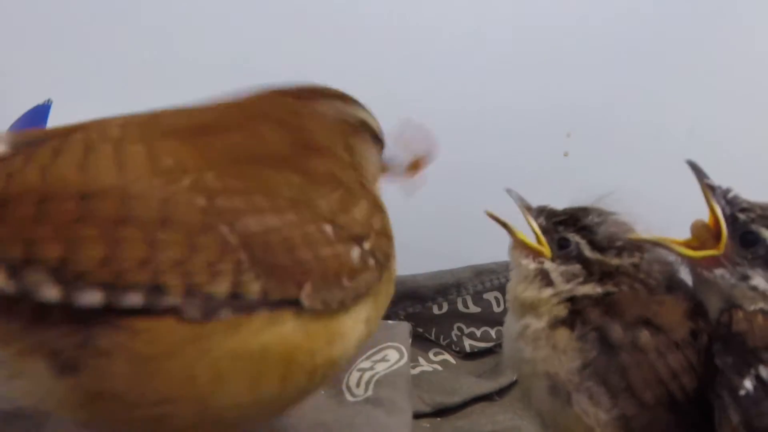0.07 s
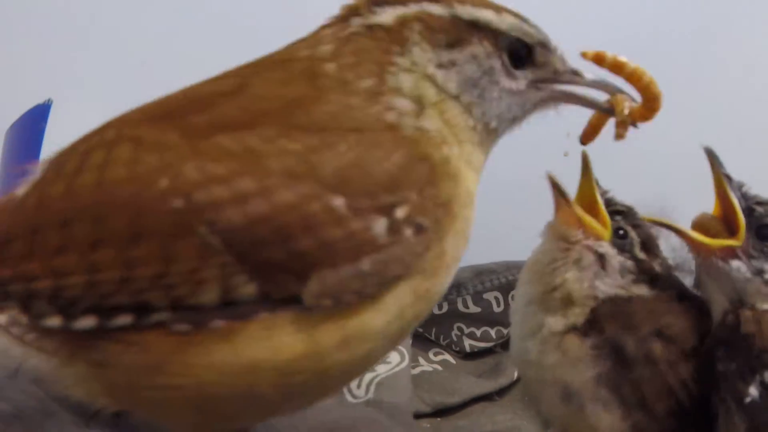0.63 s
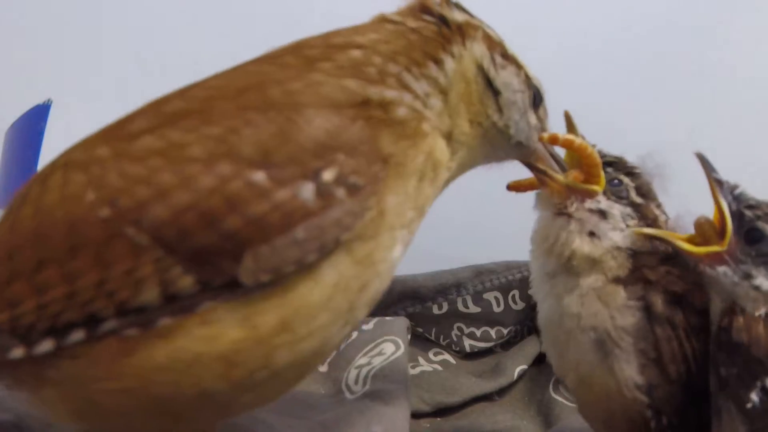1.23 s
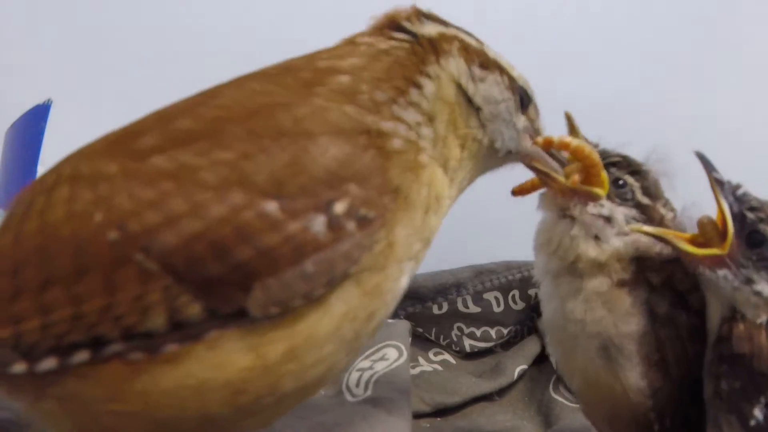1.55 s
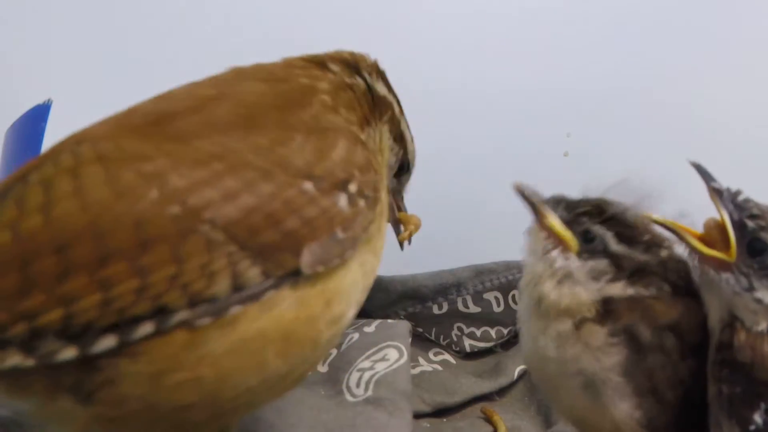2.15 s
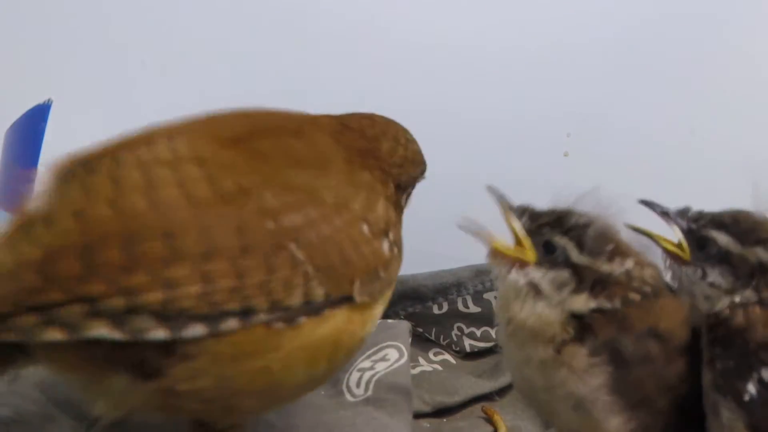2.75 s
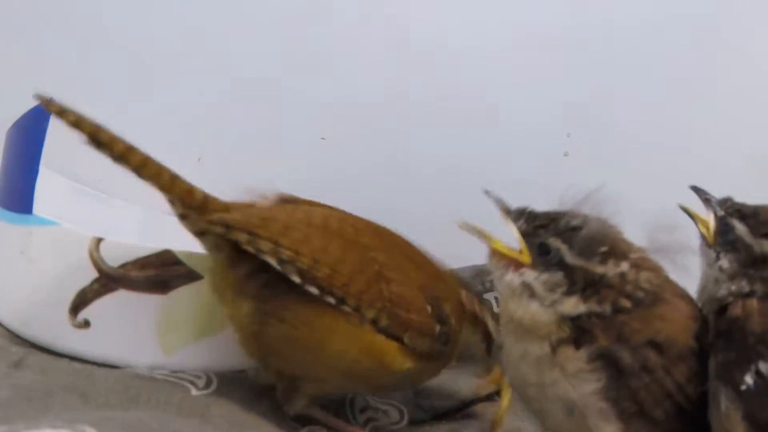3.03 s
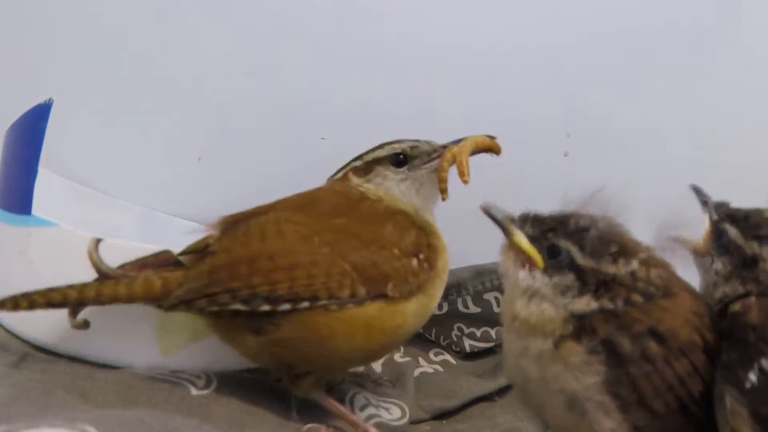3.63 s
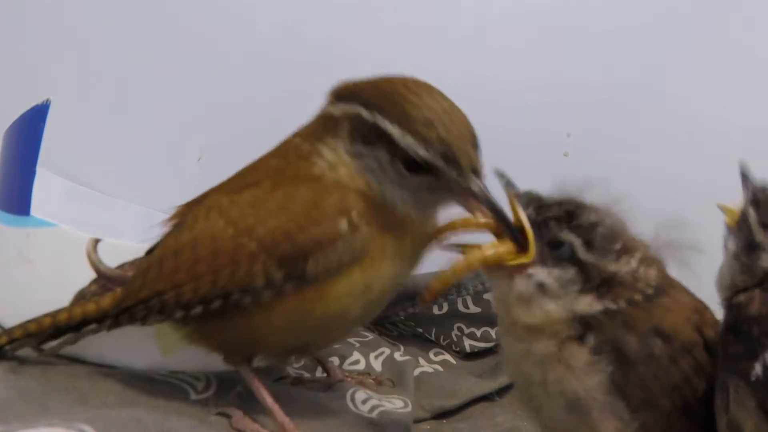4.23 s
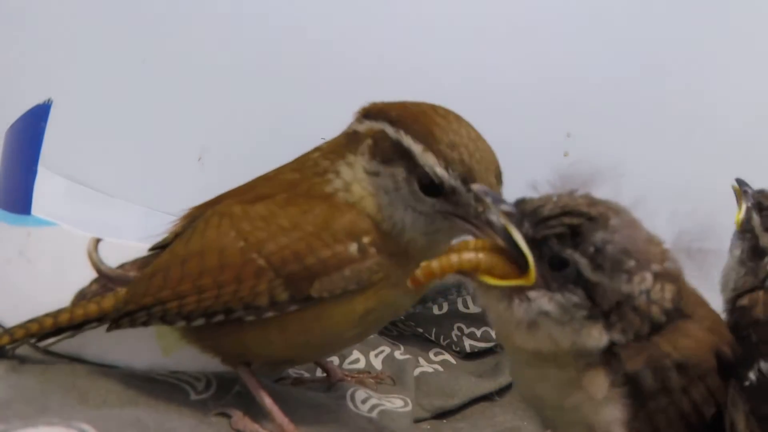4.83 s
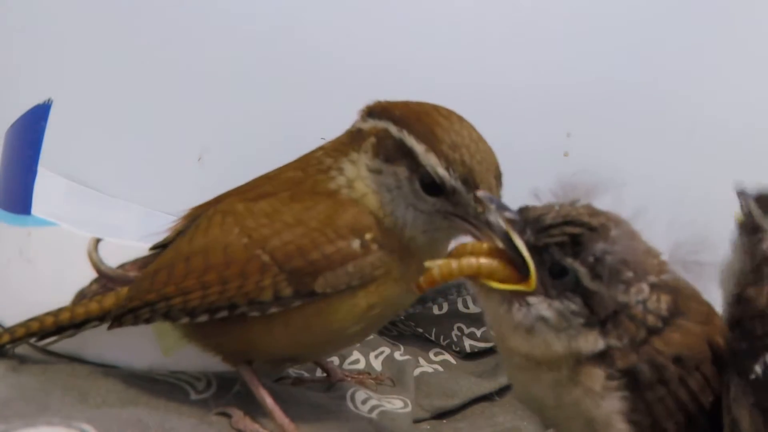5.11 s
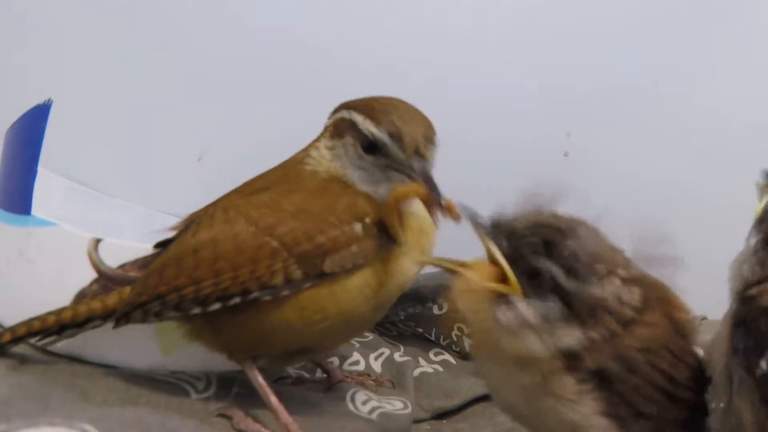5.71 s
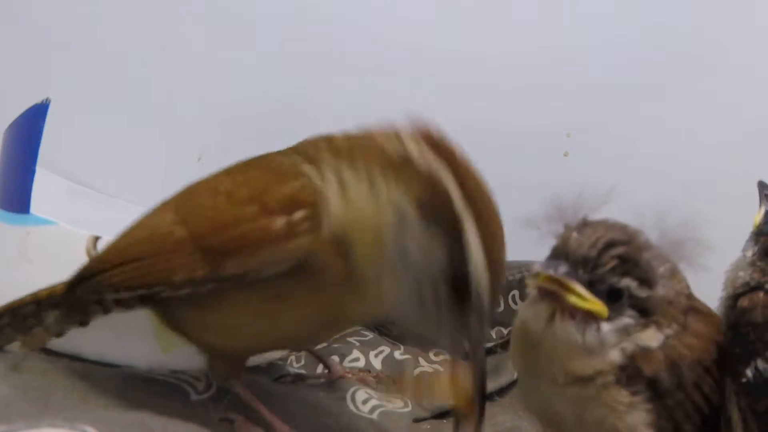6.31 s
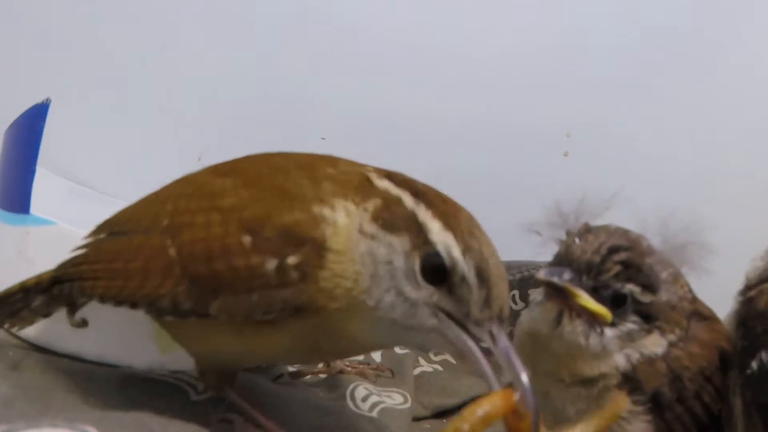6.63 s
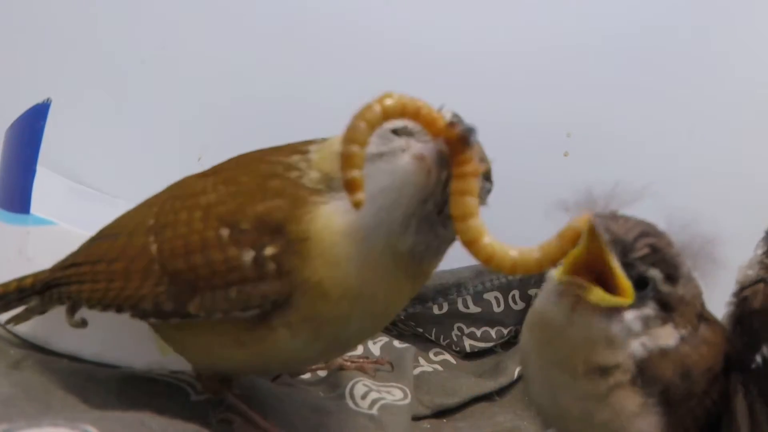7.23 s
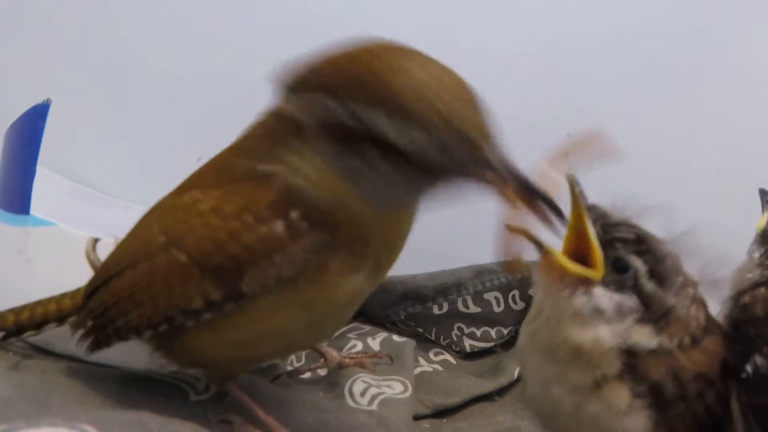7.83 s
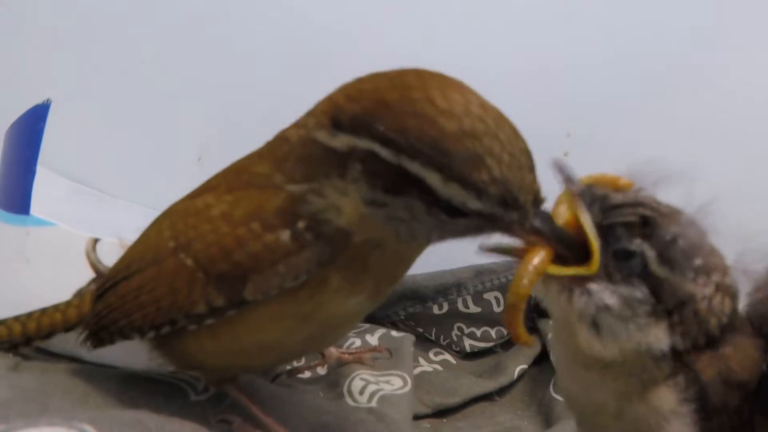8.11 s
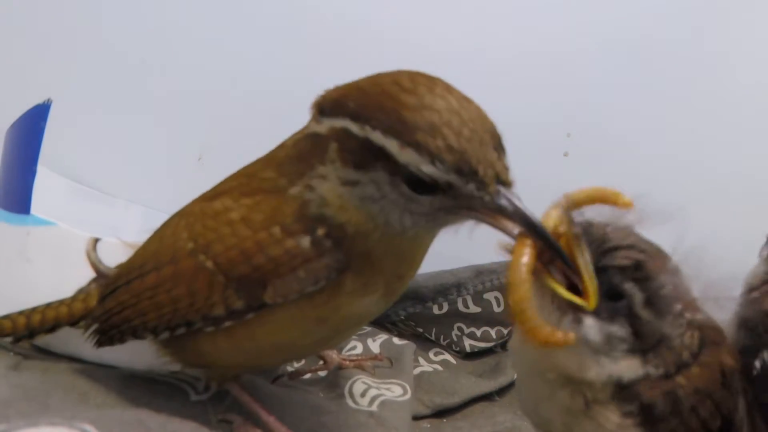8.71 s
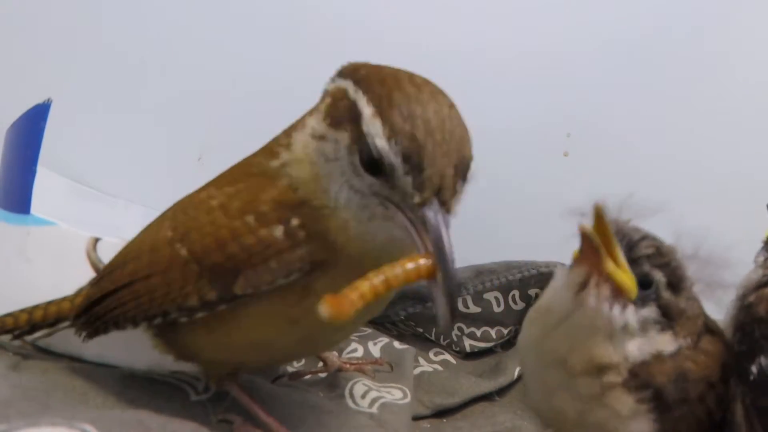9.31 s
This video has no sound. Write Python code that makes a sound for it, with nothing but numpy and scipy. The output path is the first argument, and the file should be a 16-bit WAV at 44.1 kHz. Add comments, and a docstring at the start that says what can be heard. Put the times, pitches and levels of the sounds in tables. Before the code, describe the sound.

Baby birds beg in brief, hoarse, shrill squeaks, with occasional dull hops, tiny bill clicks and a faint distant songbird.

```python
"""Wren nestlings begging in a shed

Nestlings beg eight times, close by, while a parent feeds them. Each call opens as a dry rasp of
turbulent air; then both sides of the syrinx break into a hoarse two-voiced whistle that drops away.
The parent's hops ring the nest box, its bill clicks and its feathers brush the nest.
A far songbird sings briefly over a low rumble and microphone hiss."""
import sys
import numpy as np
from scipy import signal
from scipy.fft import rfft, irfft, next_fast_len
from scipy.io import wavfile

SR = 44100
rng = np.random.default_rng(int(sys.argv[2]) if len(sys.argv) > 2 else 0)


def dump_mix(stems):
    """Bounce the given channels to the path in sys.argv[1] as a 16-bit WAV at rate SR."""
    frames = np.atleast_2d(stems).T  # one column per channel
    limited = np.clip(frames, -1, 1)  # hard clip at full scale
    pcm = np.round(limited * 32767).astype(np.int16)
    wavfile.write(sys.argv[1], SR, pcm)


N = 421155


def gain_of(db):
    """Amplitude grows tenfold for every 20 dB."""
    return 10 ** (np.asarray(db) / 20)

def unit_rms(x):
    """Normalisation to a mean power of one."""
    return x / np.sqrt(np.mean(x ** 2) + 1e-20)

def curve_at(points, hz):
    """Interpolation on a logarithmic frequency axis."""
    point_hz, value = np.transpose(points)
    return np.interp(np.log(hz + 1), np.log(point_hz + 1), value)

def add(mix, start, sound):
    """Superposition: a sound adds to the mix from its start in seconds."""
    part = mix[max(round(start * SR), 0):][:len(sound)]
    part += sound[:len(part)]

def sine(hz):
    """An oscillator's phase is the running integral of its frequency."""
    return np.sin(2 * np.pi * np.cumsum(hz) / SR)

def bandpass(x, low_hz, high_hz, order=2):
    """A band-pass filter attenuates what lies outside its two edges."""
    return signal.sosfilt(signal.butter(order, [low_hz, high_hz], "band", fs=SR, output="sos"), x)

def noise(*spectra, strength=1):
    """Source and filter: modulated white noise is coloured by each spectrum, then set to unit rms."""
    length = next_fast_len(N)
    hz = np.fft.rfftfreq(length, 1 / SR)
    colour = gain_of(sum(curve_at(points, hz) for points in spectra))
    source = rng.standard_normal(N) * strength
    return unit_rms(irfft(rfft(source, length) * colour, length)[:N])

def wander(rate_hz):
    """Low-passed noise gives a random drift of unit rms."""
    return unit_rms(signal.sosfilt(signal.butter(2, rate_hz, fs=SR, output="sos"), rng.standard_normal(N)))

def span(start, end, fade_s):
    """A tapered time window: its sample numbers, its times and its raised-cosine gate."""
    at = np.arange(max(int(start * SR), 0), min(int(max(end, start + fade_s) * SR), N))
    t = at / SR
    ramp = np.clip(np.minimum(t - start, end - t) / fade_s, 0, 1)
    return at, t, np.sin(np.pi / 2 * ramp) ** 2

def echoes(x, decay, gap_s):
    """Reverberation: sparse reflections die exponentially; decay pairs Hz with seconds to fall 60 dB."""
    length = SR // 2
    taps = rng.choice([-1., 1.], length) * (rng.random(length) < .1) * (np.arange(length) > gap_s * SR)
    hz, t, bands = signal.stft(taps, SR, nperseg=256)
    damping = gain_of(-60 * t / curve_at(decay, hz)[:, None])
    tail = signal.istft(bands * damping, SR, nperseg=256)[1]
    return signal.oaconvolve(x, tail / np.linalg.norm(tail))[:N]


# The outdoor rumble. Each row: frequency in Hz, relative spectral level in dB.
RUMBLE_SPECTRUM = [(13, -22), (22, -1), (35, -1), (53, -15.5), (68, -8), (81, -4.5), (108, -11.5),
                   (134, -8), (146, -11), (167, -19), (184, -20.5), (205, -29), (226, -31), (400, -36.5),
                   (520, -63.5), (880, -120)]
# Hums that swell out of it. Each row: start and end in seconds, pitch in Hz, level in dB.
HUM_SWELLS = [(0, 0.807, 80, -58.5), (1.982, 2.847, 88, -48), (6.3, 6.893, 86, -51.5),
              (7.198, 7.847, 80, -50)]
# Hiss, strongest at the microphone's port resonance. Each row: frequency in Hz, relative level in dB.
HISS_SPECTRUM = [(250, -6), (450, 0.5), (1000, -2.5), (2000, -6.5), (3500, -12), (4300, -17), (5700, -14),
                 (6150, -9.5), (6500, 1), (7200, -7), (9000, -10.5), (10300, -17.5), (12300, -14),
                 (13300, -29)]

def background(rumble_db, drift_db, hiss_db):
    """The noise floor is a superposition of drifting rumble, passing hums and steady microphone hiss."""
    rumble = noise(RUMBLE_SPECTRUM) * gain_of(rumble_db + drift_db * wander(rate_hz=1.2))
    for start, end, hz, level_db in HUM_SWELLS:
        at, t, gate = span(start, end, fade_s=.19)
        rumble[at] += gain_of(level_db) * gate * np.sin(2 * np.pi * hz * t)
    return rumble + gain_of(hiss_db) * noise(HISS_SPECTRUM)


# The far song. Each row: start and length in seconds, first and last pitch in Hz, relative level in dB,
# burr as a fraction of the pitch.
SONG_NOTES = [(0.332, 0.085, 2510, 2750, -71, .04), (0.482, 0.085, 2450, 2500, -72, .03),
              (6.016, 0.046, 2570, 2710, -63, .025), (6.042, 0.07, 3054, 3414, -61, .045),
              (6.168, 0.1, 2450, 2570, -65, .03), (6.455, 0.11, 3940, 3820, -70, .007),
              (6.447, 0.081, 2680, 2586, -67.5, .025), (6.591, 0.091, 2300, 2580, -69, .04),
              (6.84, .18, 3980, 3800, -72.5, .008), (6.87, 0.089, 2633, 2540, -66, .025),
              (6.915, 0.08, 2960, 3130, -66, .045), (7.019, 0.095, 2054, 2630, -65, .035)]

def far_bird(direct_db):
    """Random frequency modulation gives slurred whistles a burr; scattering by trees blurs them."""
    song, tremble = np.zeros(N), wander(rate_hz=260)
    for start, length, start_hz, end_hz, level_db, burr in SONG_NOTES:
        at, t, gate = span(start, start + length, fade_s=.039)
        glide_hz = np.interp(t, [start, start + length], [start_hz, end_hz])
        song[at] += gain_of(level_db) * gate * sine(glide_hz * (1 + burr * tremble[at]))
    return gain_of(direct_db) * song + 1.1 * echoes(song, [(2000, .3), (4000, .29)], gap_s=.0092)


# The parent's hops and shoves. Each row: start in seconds, peak in dB, pitch in Hz, seconds to fall 60 dB.
HOPS = [(1.991, -32.5, 133, 0.1), (2.919, -32, 140, 0.17), (3.048, -27, 130, 0.062),
        (3.905, -28.5, 92.8, .1), (5.926, -36.5, 142, 0.095), (6.035, -36, 135, 0.066),
        (9.344, -35, 136, 0.13)]

def box_thumps(rise_s):
    """Damped oscillation: each hop pushes the nest box, which rings low and briefly."""
    out, t = np.zeros(N), np.arange(SR // 3) / SR
    onset = 1 - np.exp(-(t / rise_s) ** 2)
    for start, peak_db, hz, t60 in HOPS:
        ring = np.sin(2 * np.pi * hz * t) * onset * gain_of(-60 * t / t60)
        add(out, start, gain_of(peak_db) * ring / abs(ring).max())
    return out


# Feathers against the nest. Each row: frequency in Hz, relative spectral level in dB.
FEATHER_SPECTRUM = [(2500, -25), (4000, -4), (4800, 0), (6000, -5), (8000, -25)]

def feather_rustle(start, end, level_db, grain_db, fade_db):
    """Friction makes grainy, fading noise as the parent brushes the nest while lifting a worm."""
    out = np.zeros(N)
    brush = noise(FEATHER_SPECTRUM, strength=gain_of(grain_db * wander(rate_hz=200)))
    at, _, gate = span(start, end, fade_s=.015)
    out[at] = brush[at] * gate * gain_of(level_db - fade_db * np.linspace(0, 1, len(at)))
    return out


# Bill clicks and claw ticks. Each row: start in seconds, peak in dB, resonance in Hz, body gain in dB.
CLICKS = [(1.96, -56, 4600, -3), (2.087, -43, 4840, -2), (2.88, -57, 4600, -3), (3.043, -49, 5200, -3),
          (3.87, -55, 4580, -3), (4.511, -54, 4770, -3), (6.591, -41, 4970, -5), (6.630, -46.5, 5300, -5),
          (6.827, -50.5, 4500, -1), (8.054, -43.5, 4930, -4), (8.637, -55, 5000, -3)]

def clicks(t60):
    """Impact excitation: a short burst drives a broad resonance and a lower band that gives it body."""
    out, t = np.zeros(N), np.arange(2048) / SR
    for start, peak_db, hz, body_db in CLICKS:
        burst = rng.standard_normal(len(t)) * gain_of(-60 * t / t60)
        click = bandpass(burst, hz * .72, hz * 1.22) + gain_of(body_db) * bandpass(burst, 1100, 3800)
        add(out, start, gain_of(peak_db) * click / abs(click).max())
    return out


# The chips that open most calls. Each row: start and length in seconds, level in dB, pitch in Hz.
ONSET_CHIPS = [(0.711, 0.014, -40, 5430), (1.682, 0.0061, -31.5, 6215), (3.454, 0.0092, -38.5, 5400),
               (4.232, .008, -42, 4860), (6.22, 0.0098, -29.5, 6280), (7.294, 0.007, -34, 5085),
               (9.092, 0.0049, -34, 5450)]

def chips(rise, jitter):
    """An onset transient: the syrinx opens with a brief, rough upward glide."""
    out, tremble = np.zeros(N), 1 + jitter * wander(rate_hz=1300)
    for start, length, level_db, hz in ONSET_CHIPS:
        at, t, gate = span(start, start + length, fade_s=.002)
        glide_hz = hz * (1 + rise * ((t - start) / length - .5))
        out[at] += gain_of(level_db) * gate * sine(glide_hz * tremble[at])
    return out


# Thin squeaks within the rasp. Each row: start and end in seconds, first and last pitch in Hz,
# relative level in dB.
MEMBRANE_SLIPS = [(0.803, 0.87, 8150, 7950, -38), (4.339, 4.4, 7900, 7560, -41.5),
                  (7.388, 7.432, 8800, 7640, -40), (9.188, 9.211, 8800, 7700, -38)]

def squeaks(warble_hz, depth, jitter):
    """Sawtooth frequency modulation: the membrane slips in quick downward slurs before it settles."""
    out, tremble = np.zeros(N), 1 + jitter * wander(rate_hz=1100)
    for start, end, start_hz, end_hz, level_db in MEMBRANE_SLIPS:
        at, t, gate = span(start, end, fade_s=.004)
        slur = (t - start) * warble_hz % 1  # runs from 0 to 1 in each slip
        pitch_hz = np.interp(t, [start, end], [start_hz, end_hz]) * (1 + depth * (.5 - slur))
        pulses = 2 * np.sin(np.pi * slur)
        out[at] += gain_of(level_db) * gate * pulses * sine(pitch_hz * tremble[at])
    return out


def syrinx_flutter(rate_hz):
    """Amplitude modulation: the chattering syrinx lets air through in uneven spurts."""
    throb = sine(rate_hz * (1 + .35 * wander(rate_hz=60)))
    return unit_rms(gain_of(1.3 * throb + 1.3 * wander(rate_hz=110) + 1.6 * wander(rate_hz=1700)))


# The rasp through each call. Each row: start and end in seconds, mid-call level of the 1000-4200 Hz band
# in dB, growth from start to end in dB.
CALL_RASPS = [(0, .23, -43.5, -1.5), (.718, 0.974, -41, 11), (1.684, 1.843, -38.5, -1),
              (3.459, 3.671, -42.5, -4), (4.242, 4.449, -42.5, 0.5), (6.224, 6.426, -39.5, 2),
              (7.301, 7.532, -41.5, 1), (9.098, 9.336, -41, 1.5)]
# One spectrum per call, set by the gape and the turn of the head.
# Each point: frequency in Hz, relative spectral level in dB.
GAPE_SPECTRA = [
    [(820, -30.5), (1400, -14.5), (1750, -10.5), (2300, -26), (3020, -6), (3410, 0), (3590, -9),
     (4670, -2.5), (5000, -13), (5450, -3), (6360, -5), (7610, -14.5), (9340, -10), (10300, -23),
     (10800, -20), (14000, -48), (22000, -120)],
    [(790, -44), (1350, -10), (1580, -14), (1980, -15), (2160, -17), (2980, -6.5), (3400, -5.5),
     (3670, -0.5), (4290, -8), (6630, 0.5), (7430, -14.5), (8030, -8.5), (9230, -7.5), (9990, -21.5),
     (10800, -30.5), (14000, -61), (22000, -120)],
    [(870, -40), (1480, -14), (1790, -20.5), (2220, -13), (2750, -14), (2970, -8), (3210, -10.5),
     (3670, -1.5), (4460, -13), (5020, -5), (5860, 1.5), (7080, -2.5), (7830, -16.5), (8470, -15),
     (9600, -27.5), (12500, -62), (21100, -120)],
    [(790, -35), (1350, -10.5), (1550, -15), (1710, -15.5), (1850, -13), (2360, -24), (3090, -1),
     (3800, -13.5), (4640, -3.5), (5020, -20), (5290, -8.5), (5620, 1.5), (7830, -21.5), (8390, -16),
     (10800, -24), (14000, -54), (22000, -120)],
    [(790, -33), (1350, -14.5), (1650, -13.5), (2310, -19), (3030, -4), (3910, -11), (4150, -8.5),
     (4970, -7), (5720, -2), (6210, -5.5), (6640, 2.5), (7270, -14), (8090, -8), (9310, -18.5),
     (9700, -40.5), (12600, -45.5), (21300, -120)],
    [(760, -41), (1300, -19), (1490, -20.5), (2300, -22), (2530, -19.5), (3040, -13.5), (3310, -13.5),
     (3630, -10.5), (4440, -18.5), (4710, -5.5), (6060, -7), (6530, 2), (7050, -17), (9070, -27),
     (9700, -40), (12600, -63), (21300, -120)],
    [(760, -37), (1300, -15.5), (1960, -20), (2320, -16.5), (2840, -15.5), (3070, -10.5), (3570, -7),
     (4440, -10), (4630, -7.5), (6370, -1), (6640, -1), (6930, -13), (7410, -11), (8700, -11),
     (9700, -19.5), (12600, -55), (21300, -120)],
    [(760, -35), (1300, -13.5), (2010, -19), (2880, -10), (3270, -7.5), (3620, -4), (4370, -10), (4600, -4),
     (5180, -3.5), (5640, -7), (6310, 4), (7050, -12.5), (7940, -11.5), (8720, -9), (10000, -19),
     (13000, -50), (22000, -120)],
]

def rasp(flutter, attack_s, attack_db, release_s, release_db):
    """Turbulence excites the resonances of the open gape; the flow builds up, holds and slackens."""
    out = np.zeros(N)
    for (start, end, level_db, growth_db), gape in zip(CALL_RASPS, GAPE_SPECTRA):
        at, t, gate = span(start - .004, end + .002, fade_s=.0087)
        air = noise(gape, strength=flutter)[at]
        air /= np.std(bandpass(air, 1000, 4200, order=4))
        attack = attack_db * np.maximum(1 - (t - start) / attack_s, 0)
        release = release_db * np.maximum(1 - (end - t) / release_s, 0) ** 2
        hold = level_db + growth_db * ((t - start) / (end - start) - .5)
        out[at] += air * gate * gain_of(hold - attack - release)
    return out


# Hoarse bursts, mostly at the height of a call.
# Each row: start and end in seconds, first and last level in dB.
SCREECH_BURSTS = [(0.058, 0.212, -38, -31.5), (0.79, 0.97, -31, -34.5), (1.775, 1.84, -45, -44.5),
                  (3.542, 3.674, -31, -38), (4.366, 4.453, -35, -28.5), (6.324, 6.412, -25, -29.5),
                  (7.296, 7.323, -26, -39.5), (7.409, 7.518, -22.5, -31), (9.189, 9.338, -28, -30.5)]
# The flapping membranes. Each row: frequency in Hz, relative spectral level in dB.
MEMBRANE_SPECTRUM = [(3800, -24.5), (4500, -9), (4900, -1.5), (5500, -2), (6050, -6), (6500, 0.5),
                     (7100, -3.5), (7600, -19.5), (8500, -32)]

def screech(flutter):
    """Chaotic vibration: at full pressure the membranes make bands of noise, filtered by the gape."""
    out = np.zeros(N)
    chaos = [noise(MEMBRANE_SPECTRUM, gape, strength=flutter) for gape in GAPE_SPECTRA]
    call_middles = np.array(CALL_RASPS)[:, :2].mean(axis=1)
    for start, end, start_db, end_db in SCREECH_BURSTS:
        call = np.argmin(abs(call_middles - start))
        at, t, gate = span(start, end, fade_s=.0074)
        out[at] += chaos[call][at] * gate * gain_of(np.interp(t, [start, end], [start_db, end_db]))
    return out


def port_resonance_db(hz, centre_hz=6560, half_width_hz=160, peak_db=11):
    """Resonance: a tone flares as it glides through the natural frequency of the microphone's port."""
    return peak_db / (1 + ((hz - centre_hz) / half_width_hz) ** 2)

def voice(hz, strength, jitter, waver, shimmer_db):
    """One side of the syrinx oscillates as a near sine, randomly modulated in pitch and amplitude."""
    tremble = 1 + jitter * wander(rate_hz=2100) + waver * wander(rate_hz=150)
    shimmer = shimmer_db * wander(rate_hz=221)
    return np.sqrt(2) * sine(hz * tremble) * strength * gain_of(shimmer + port_resonance_db(hz))


# Whistle arches, one or two per call. Each row: start, crest and end in seconds; upper and lower crest
# pitch, upper voice's rise, shared sag and final drop in Hz; upper and lower relative crest level in dB;
# upper and lower swell from the edges to the crest in dB.
WHISTLE_ARCHES = [(.076, .145, .233, 7100, 5600, 200, 380, 2800, -32.5, -47, 6, -10),
                  (.893, .93, .955, 7310, 6060, 40, 30, 0, -16, -22, 15, 15),
                  (.956, .965, .992, 6750, 5450, 30, 60, 2800, -43, -47, -12, 2),
                  (1.774, 1.817, 1.844, 7410, 6070, 460, 30, 0, -16.5, -20.5, 9, 9),
                  (3.554, 3.584, 3.676, 7010, 5760, 400, 330, 2400, -31.5, -23.5, 4, 15),
                  (4.394, 4.411, 4.441, 6940, 5400, 30, 380, 0, -22.5, -37, 6, 4),
                  (4.442, 4.447, 4.456, 6590, 5400, 30, 60, 100, -27.5, -42, 2, 4),
                  (6.321, 6.364, 6.434, 7100, 5690, 800, 330, 2400, -28.5, -17.5, 0, 12),
                  (7.411, 7.468, 7.54, 7130, 5720, 600, 540, 2200, -31, -20, -4, 13),
                  (9.212, 9.268, 9.344, 7200, 5750, 400, 560, 2200, -31.5, -22.5, -3, 11)]

def whistles(lower_rise_hz, lower_delay_s, drop_s, fade_db_per_hz):
    """Biphonation: one arch of air pressure bends the pitch and strength of both sides of the syrinx."""
    hz, strength = np.zeros((2, N)), np.zeros((2, N))
    for (start, crest, end, upper_hz, lower_hz, rise_hz, sag_hz, drop_hz,
         upper_db, lower_db, upper_swell_db, lower_swell_db) in WHISTLE_ARCHES:
        at, t, gate = span(start, end, fade_s=.0035)
        before_crest = np.interp(t, [start, crest], [1, 0]) ** 2
        after_crest = np.interp(t, [crest, end], [0, 1]) ** 1.5
        # As the pressure collapses, pitch and strength drop together.
        collapse_hz = drop_hz * np.interp(t, [end - drop_s, end], [0, 1]) ** 2
        fall_hz = sag_hz * after_crest + collapse_hz
        hz[0, at] = upper_hz - rise_hz * before_crest - fall_hz
        hz[1, at] = lower_hz - lower_rise_hz * before_crest - fall_hz
        slack, fade_db = before_crest + after_crest, fade_db_per_hz * collapse_hz
        # The lower voice needs more pressure and catches a moment later.
        lower_gate = gate * np.clip((t - start) / lower_delay_s - 1, 0, 1)
        strength[0, at] = gate * gain_of(upper_db - upper_swell_db * slack - fade_db)
        strength[1, at] = lower_gate * gain_of(lower_db - lower_swell_db * slack - fade_db)
    upper = voice(hz[0], strength[0], jitter=.007, waver=.0028, shimmer_db=1.2)
    lower = voice(hz[1], strength[1], jitter=.01, waver=.0075, shimmer_db=1.7)
    return gain_of(-.2) * upper + gain_of(-.3) * lower


# The shed's reverberation. Each row: frequency in Hz, seconds to fall 60 dB.
SHED_DECAY = [(500, .25), (3000, .22), (5500, 0.089), (6600, 0.17), (7400, .115), (13000, .1)]

def scene():
    """Direct sound from the nest sums with reflections from its nook and the shed, and the outdoors."""
    flutter = syrinx_flutter(rate_hz=94)
    calls = squeaks(warble_hz=96.5, depth=.12, jitter=.019)
    calls += rasp(flutter, attack_s=.008, attack_db=7, release_s=.04, release_db=11)
    calls += screech(flutter)
    calls += whistles(lower_rise_hz=450, lower_delay_s=.006, drop_s=.022, fade_db_per_hz=.0028)
    calls += chips(rise=.14, jitter=.08)
    nest = calls + clicks(t60=.017)
    nest += feather_rustle(start=6.82, end=6.97, level_db=-71, grain_db=4, fade_db=7)
    nook = gain_of(-13) * echoes(nest, [(1000, .04), (8000, .027)], gap_s=.001)
    shed = gain_of(-20) * echoes(nest, SHED_DECAY, gap_s=.006)
    ambience = far_bird(direct_db=2.5) + background(rumble_db=-45.5, drift_db=.66, hiss_db=-63)
    return (nest + nook + shed + box_thumps(rise_s=.0062) + ambience)[None]

def record(dry, cutoff_hz=14320):
    """Band limiting: the camera's steep low-pass filter removes the highest treble."""
    lowpass = signal.firwin(511, cutoff_hz, window=("kaiser", 9), fs=SR)
    return signal.oaconvolve(dry, lowpass[None], "same")


dry = scene()
out = record(dry)
dump_mix(out)
```